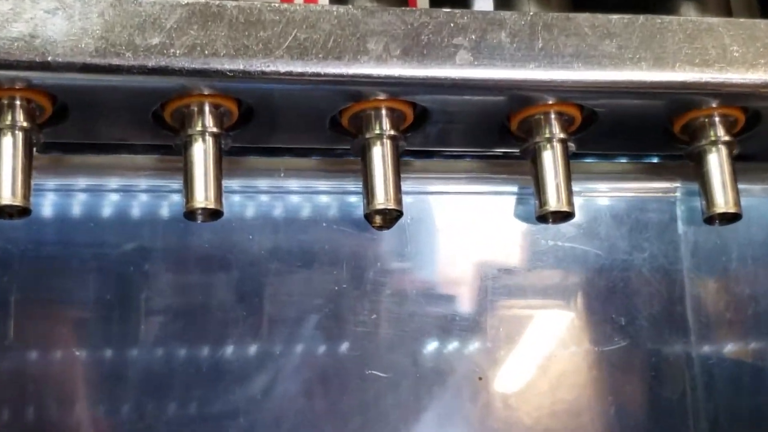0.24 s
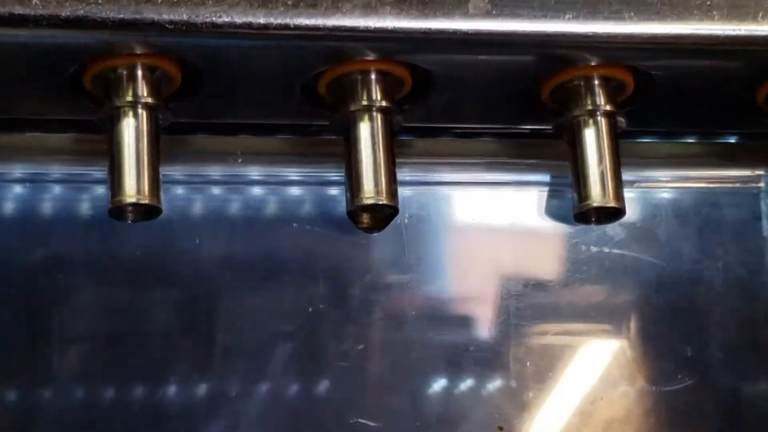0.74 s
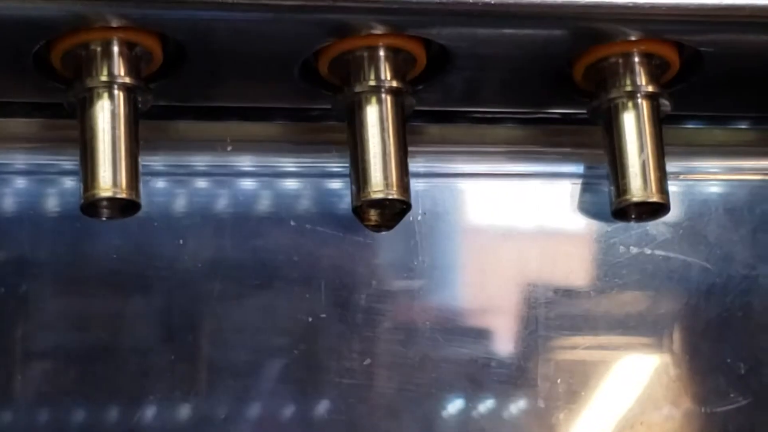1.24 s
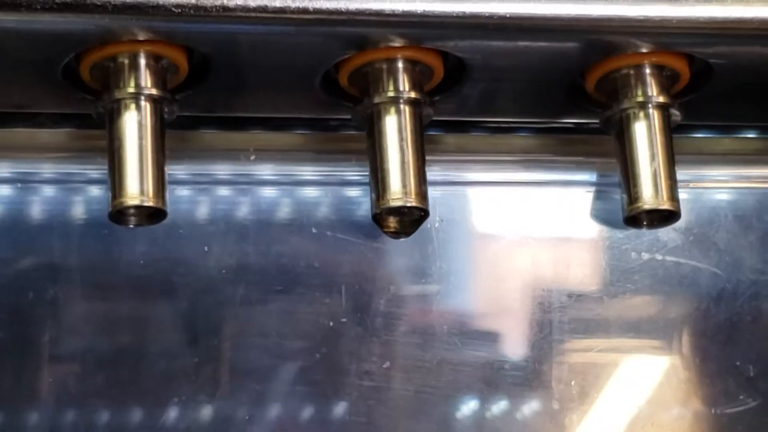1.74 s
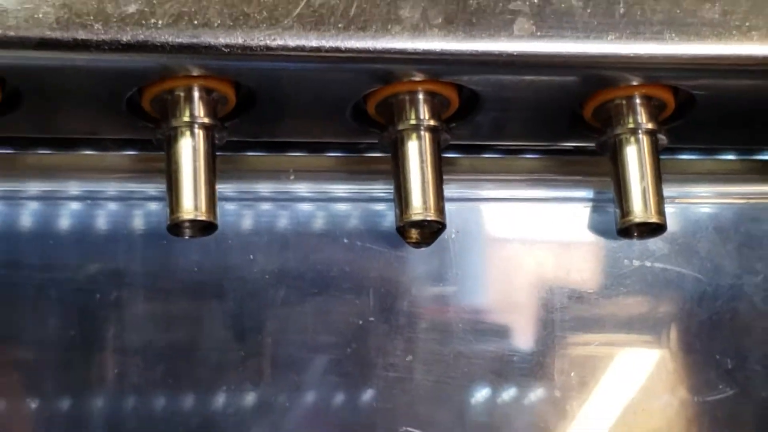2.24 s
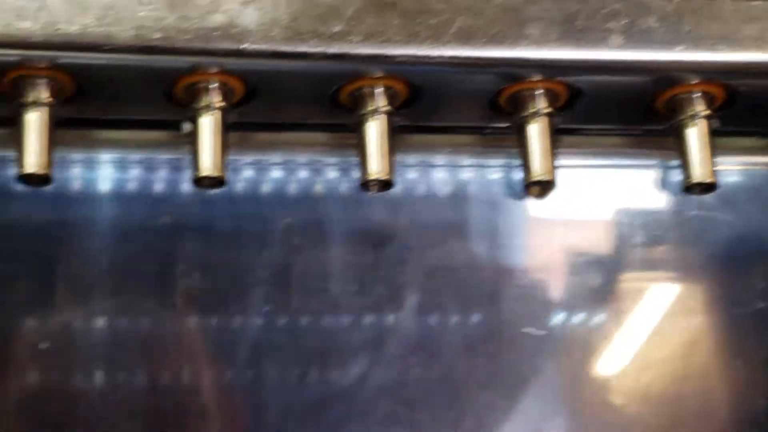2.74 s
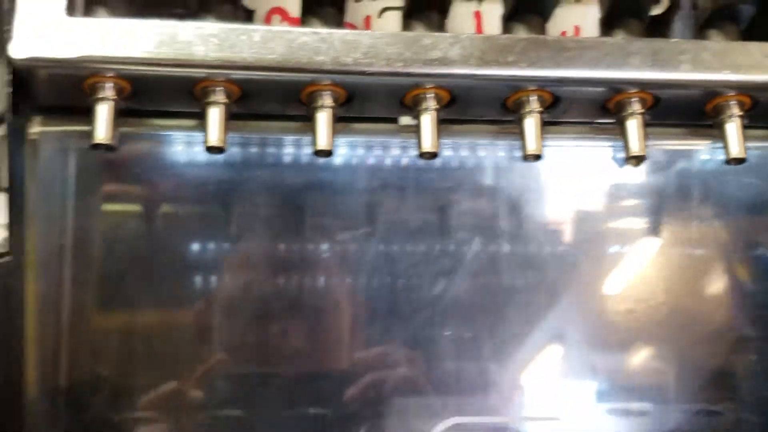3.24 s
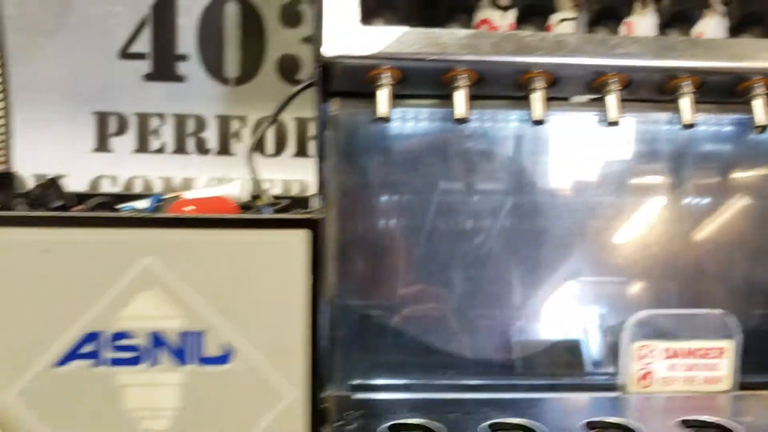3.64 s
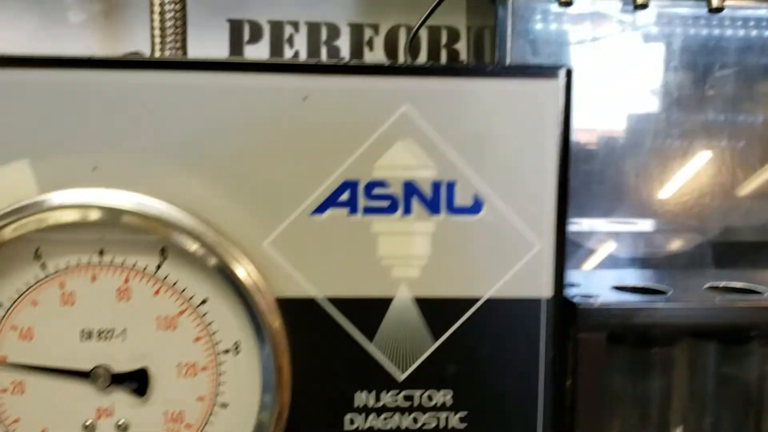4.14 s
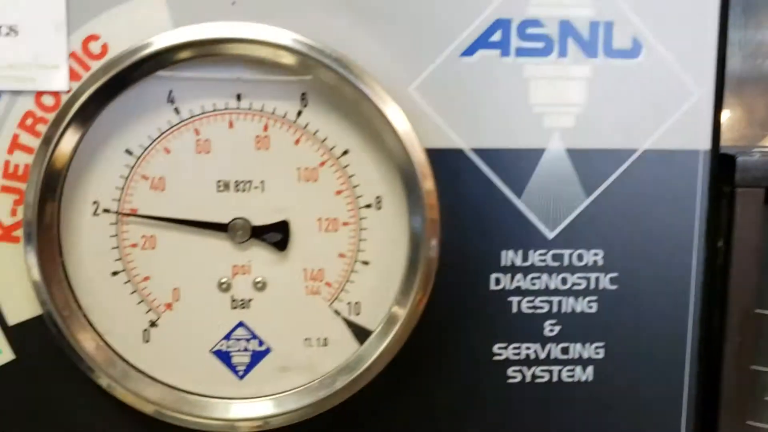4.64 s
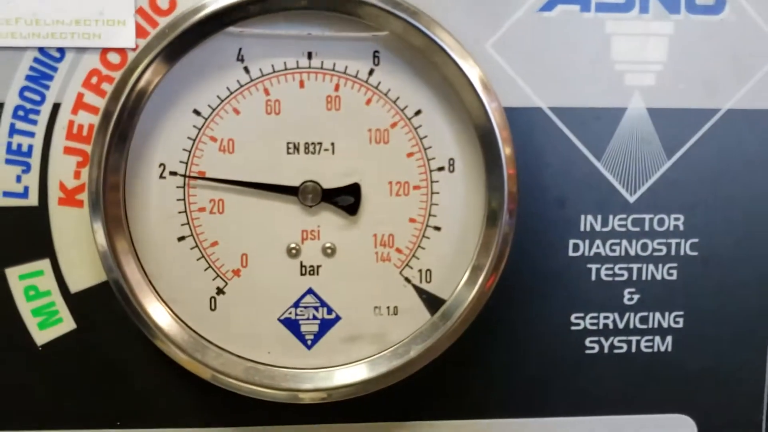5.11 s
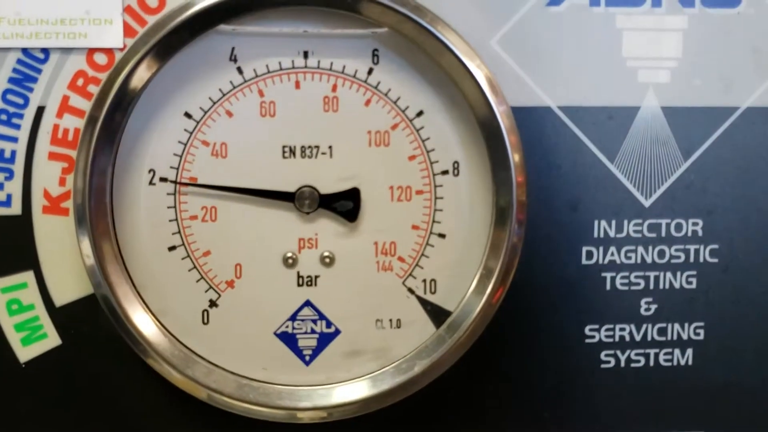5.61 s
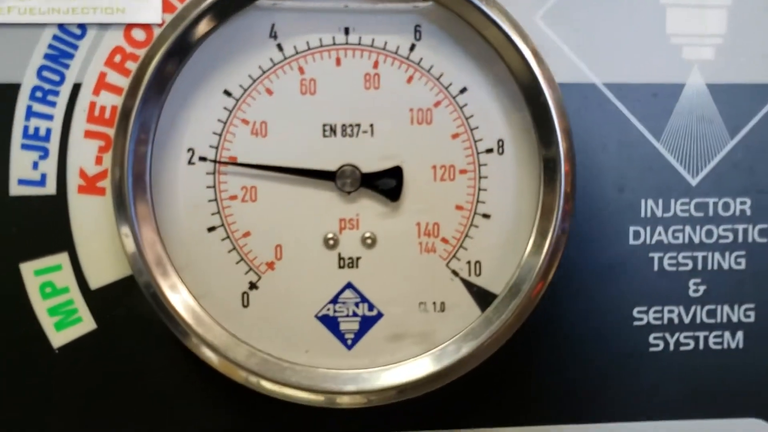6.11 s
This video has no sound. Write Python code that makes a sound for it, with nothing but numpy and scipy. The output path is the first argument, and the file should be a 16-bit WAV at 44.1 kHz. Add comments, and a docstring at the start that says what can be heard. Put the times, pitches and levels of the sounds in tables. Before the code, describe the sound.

From 0 to 1.6 seconds, an injector test bench runs steadily in a workshop, heard closely in stereo. A buzzy, slightly fluttering pump whine with many harmonics sits over a grainy, bright rush of fluid, with low mains and motor hum and fan rumble beneath. Small wet spits come around 0.2, 0.7 and 1.0 seconds, with a faint frame thrum near 0.2. At 1.6 the pump is switched off: its tones plunge and die in about a fifth of a second, the frame swells briefly, bright valve clicks snap, and a short hollow pipe knock lands at 1.7. The fluid sags and vanishes by about 1.9, with a last spit at 2.0. Then only beating low hum, fan rumble and a fine high hiss throbbing about seven times a second remain. From 3 to 4.5 the microphone glides to the cabinet and much of the hum strengthens, droning unchanged to the end at about 6.4.

```python
"""A fuel injector test bench in a workshop, heard in stereo.
At first a vane pump whines as a sum of shaft harmonics over rushing fluid, shaped from noise. Mains, motor
and fan hum as close, beating sines, a hiss throbs and fan air rumbles; all of these drone on to the end.
Fluid spits in the lines and the frame thrums. At 1.6 s the pump is switched off: its tones fall and die
as it coasts down, valves click, and the pipes knock. From about 3 s the microphone glides from the spray
chamber to the control cabinet, where much of the hum is stronger."""
import sys
import numpy as np
from scipy import signal
from scipy.fft import rfft, irfft, next_fast_len
from scipy.io import wavfile
from scipy.ndimage import uniform_filter1d, map_coordinates

SR = 44100
rng = np.random.default_rng(int(sys.argv[2]) if len(sys.argv) > 2 else 0)


def dump(signal):
    """Clip the signal to [-1, 1] and save it as 16-bit WAV at the path in sys.argv[1]."""
    limited = np.clip(np.atleast_2d(signal).T, -1, 1)
    pcm = np.round(limited * 32767).astype(np.int16)
    wavfile.write(sys.argv[1], SR, pcm)


N = 280917
TIME_S = np.arange(N) / SR
TOP_HZ = 15750  # band limit of the recorder
SWITCH_OFF_S = 1.608  # the pump loses power
MOVE_S, MOVE_EASE_S = 3.63, 0.41  # the microphone's move: halfway time and easing time


def amp(db):
    """Level: a gain is ten to the power of a twentieth of its decibels."""
    return 10 ** (np.asarray(db) / 20)


def unit(x):
    """Normalization: scale to a root mean square of 1."""
    return x / np.sqrt(np.mean(x ** 2) + 1e-20)


def along(points, hz):
    """Logarithmic interpolation: read (Hz, value) points on a log frequency axis."""
    f, v = np.transpose(points)
    return np.interp(np.log(hz + 1), np.log(f + 1), v)


def since(s):
    """Elapsed time: seconds since a moment, 0 before it."""
    return np.maximum(TIME_S - s, 0)


def nearness():
    """Sigmoid motion: the microphone's nearness to the cabinet, 0 to 1, through one smooth move."""
    return .5 + .5 * np.tanh((TIME_S - MOVE_S) / (2 * MOVE_EASE_S))


def wobble(rate):
    """Slow random modulation: a smooth curve through random knots, rate knots a second."""
    knots = rng.standard_normal(int(N * rate / SR) + 4)
    return map_coordinates(knots, [np.arange(N) * rate / SR])


def sputter(rate, decay_s):
    """Shot noise: random spits, rate a second, start at once and decay exponentially; mean 0, rms 1."""
    impulses = (rng.random(N) < rate / SR) * rng.uniform(.5, 1, N)
    level = signal.lfilter([1], [1, -np.exp(-1 / (decay_s * SR))], impulses)
    return unit(level - level.mean())


def filtered(x, response):
    """Linear filtering: multiply the spectrum of x by a response of frequency."""
    m = next_fast_len(N + SR // 2)
    return irfft(rfft(x, m) * response(np.fft.rfftfreq(m, 1 / SR)), m)[..., :N]


def panned(lean_db):
    """Level panning: left and right gains that keep the total power."""
    pair = amp(np.array([[.5], [-.5]]) * lean_db)
    return pair / np.sqrt(np.mean(pair ** 2, axis=0))


# Likeness of the two channels. Each row: frequency in Hz, left-right correlation from -1 to 1.
LIKENESS = [(60, .99), (250, .95), (470, .8), (700, .35), (1400, -.05), (4000, 0)]


def half_angle(hz, lowest=-1):
    """Interchannel coherence: half the angle in radians whose cosine is the left-right correlation."""
    return np.arccos(np.clip(along(LIKENESS, hz), lowest, 1)) / 2


# Stereo balance. Each row: frequency in Hz, level of left over right in dB.
BALANCE = [(27, -1), (57, -2.3), (110, 3.3), (220, .5), (700, 2.5), (2400, 2), (4400, 0), (8100, 1),
           (13000, -1.5)]


def spread(pair, spectrum):
    """Diffuse field: two signals, coloured, become stereo of rms 1, alike in the bass, not in the treble."""
    def color(hz):
        angle = half_angle(hz)
        return amp(along(spectrum, hz)) * [np.cos(angle), np.sin(angle)]
    mid, side = filtered(pair, color)
    stereo = np.array([mid + side, mid - side])
    return unit(filtered(stereo, lambda hz: panned(along(BALANCE, hz))))


def rush(spectrum, ripple_db=1.48, patchy_db=1.3):
    """Turbulent noise: stereo of rms 1, rippled by panel reflections and patchy with turbulence."""
    z = signal.stft(rng.standard_normal((2, N)), nperseg=2048)[2]
    ripple = rng.standard_normal((2, z.shape[1], 1))
    ripple = unit(uniform_filter1d(ripple, size=3, axis=1))
    patches = uniform_filter1d(rng.standard_normal(z.shape[1:]), size=6, axis=0)
    patches = unit(uniform_filter1d(patches, size=3, axis=1))
    textured = z * amp(ripple_db * ripple + patchy_db * patches)
    pair = signal.istft(textured, nperseg=2048)[1][:, :N]
    return spread(pair, spectrum)


def tone(cycles, hz, lean_db):
    """Interchannel phase: a stereo sine of rms 1 whose left leads, more so for high tones."""
    lead = half_angle(hz)
    phase = 2 * np.pi * (cycles + rng.random())
    return np.sqrt(2) * panned(lean_db) * np.sin(phase + np.array([[lead], [-lead]]))


def resonance(hz, half_width_hz):
    """Resonance: stereo noise of rms 1 in one band, down to half amplitude a half-width off centre."""
    def band(f):
        return 1 / (1 + ((f * f - hz * hz) / (f * half_width_hz * 2 + 1)) ** 2)
    mid, side = filtered(rng.standard_normal((2, N)), band)
    side = side * np.tan(half_angle(hz, lowest=0))
    return unit(np.array([mid + side, mid - side]))


def burst(s, hz, half_width_hz, rise_s, t60_s):
    """Damped transient: one resonance rises and loses 60 dB in t60_s; about rms 1 at its crest."""
    age = since(s)
    shape = (1 - np.exp(-age / rise_s)) * amp(-60 * age / t60_s)
    return unit(shape * resonance(hz, half_width_hz)) * np.sqrt(np.mean(shape ** 2)) / shape.max()


PUMP_HZ, COAST_S = 52.1, .09  # full shaft speed, and time constant of its exponential fall
STALL_SHARE = 0.18  # below this share of full speed the tones die
WHINE_DB = 0.33  # added to the whole pump
SHAKE_DB = 3.5  # the slowing pump shakes its mounts more: extra level towards standstill
# Pump tones, many at multiples of its nine vanes. Each row: shaft order (multiple of the shaft speed),
# level in dB before WHINE_DB, level of left over right in dB.
PUMP_TONES = [(2, -44, 1), (3, -50, 4), (5, -49.5, 1), (9, -41, 1), (11, -61, 6), (18, -47.5, 8),
              (19, -66, -4), (27, -54, 2), (28, -62, 10), (36, -57.5, 5), (45, -63, 7), (54, -60.5, 5),
              (63, -65, 12), (72, -67, 9), (90, -59, -8), (99, -63, -1), (117, -67, 4), (124, -67, 2),
              (134, -57.5, 10), (135, -60.5, -2)]
# Resonances of the frame, swept by the falling tones. Each row: frequency in Hz, relative response in dB.
FRAME_RESPONSE = [(60, -5), (100, 7), (128, 12), (170, -2), (210, 1), (250, 12.5), (300, -5.5), (370, -5),
                  (470, 1.5), (520, -1), (595, 17), (680, -1), (800, -4), (940, 3.5)]


def pump(drift=.0003, flutter_db=.5, treble_flutter_db=4.0, jitter_turns=0.00028, scrape_db=-52):
    """Harmonics of rotation: tones follow the shaft, and a brush scrape repeats with every turn."""
    speed = np.exp(-since(SWITCH_OFF_S) / COAST_S)
    turning = np.minimum(speed / STALL_SHARE, 1) ** 2
    turns = np.cumsum(PUMP_HZ * speed * (1 + drift * wobble(12.46))) / SR + jitter_turns * wobble(120)
    tones = np.zeros((2, N))
    for order, db, lean_db in PUMP_TONES:
        hz = order * PUMP_HZ
        flutter = (flutter_db + treble_flutter_db * np.sqrt(hz / TOP_HZ)) * wobble(35.0)
        swept_db = along(FRAME_RESPONSE, hz * speed) - along(FRAME_RESPONSE, hz)
        # high orders are the first to go as the speed drops
        level = amp(db + flutter + swept_db) * speed ** (hz / 1300)
        tones += level * tone(order * turns, hz, lean_db)
    track = rng.standard_normal((2, int(SR / PUMP_HZ)))  # one turn of roughness
    scrape = np.array([map_coordinates(side, [turns % 1 * len(side)], mode="grid-wrap") for side in track])
    scrape = amp(scrape_db) * speed ** 2 * spread(scrape, FLUID_SPECTRUM)
    return amp(WHINE_DB + SHAKE_DB * (1 - speed)) * turning * (tones + scrape)


FLOW_DB, SAG_DB_PER_S = -46, 23  # the flow holds while the pump runs, then sags with the pressure
SHUT_S, SHUT_DB_PER_S = 1.8, 300  # the regulator shuts and the flow dies
# Colour of fluid noise, also of the pump's scrape. Each row: frequency in Hz, relative level in dB.
FLUID_SPECTRUM = [(250, -6), (500, -2.5), (600, 8.5), (720, -2.5), (1300, -1.5), (1900, -4.5), (2600, -3),
                  (4200, -0.5), (4650, -3), (5200, -5), (7200, 2), (8100, -11.5), (10500, -7), (12100, 3),
                  (15500, -10)]


def fluid(surge_db=1.1, sputter_db=1.4, grain_db=1.4, rattle_db=-11, rattle_swing_db=3.5):
    """Flow noise: fluid rushes and sputters, rattling the regulator, until the pressure is gone."""
    flow_db = FLOW_DB - SAG_DB_PER_S * since(SWITCH_OFF_S) - SHUT_DB_PER_S * since(SHUT_S)
    texture_db = surge_db * wobble(14.0) + sputter_db * sputter(rate=45, decay_s=.01) + grain_db * wobble(500)
    stream = amp(texture_db) * rush(FLUID_SPECTRUM)
    rattle_level = amp(rattle_db + rattle_swing_db * sputter(rate=53, decay_s=.02))
    rattle = rattle_level * resonance(4700, 450)
    return amp(flow_db) * (stream + rattle)


# Steady tones of mains, motor and fan. Each row: frequency in Hz, level in dB, extra dB at the cabinet.
HUM_TONES = [(27.2, -58, -1), (56.7, -41.5, -4.5), (108.4, -47.5, 8), (113, -53.5, 6), (120.23, -40, 4.5),
             (169, -61.5, 10.5), (176.9, -55, 5), (197.2, -54.5, 3), (216.7, -46.5, 2.5), (226.4, -51.5, 0),
             (240, -47.5, -0.5), (327.3, -70, 10), (336.5, -64, 0), (377, -59.5, 0.5), (864, -63.5, -19)]


def hum(waver_db=0.55, drift_cycles=0.015):
    """Beating by superposition: close tones of mains, motor and fan interfere."""
    near = nearness()
    out = np.zeros((2, N))
    for hz, db, near_db in HUM_TONES:
        level = amp(db + near_db * near + waver_db * wobble(4))
        cycles = hz * TIME_S + drift_cycles * wobble(2.98)
        out += level * tone(cycles, hz, along(BALANCE, hz))
    return out


SLIP_BEAT_HZ = 6.89  # the motor's slip against the mains
# Colour of the hiss. Each row: frequency in Hz, relative level in dB.
HISS_SPECTRUM = [(2000, -11), (4500, -10), (7000, -6.5), (8400, -22), (10000, -9), (11000, -5.5),
                 (11800, 3), (12400, -1.5), (13500, -8), (15000, -19), (15700, -13)]


def hiss(db=-52.0, crest_s=0.058, uneven_db=1.0, sputter_db=.9, throb_db=2.8, grain_db=.9):
    """Amplitude modulation: fine hiss throbs with the motor's slip, rising faster than it falls."""
    beat = 2 * np.pi * SLIP_BEAT_HZ * (TIME_S - crest_s)
    throb = np.cos(beat) - .15 * np.sin(2 * beat)
    spit_db = sputter_db * sputter(rate=55, decay_s=0.012)
    texture_db = uneven_db * wobble(7.6) + spit_db + grain_db * wobble(900)
    return amp(db + throb_db * throb + texture_db) * rush(HISS_SPECTRUM)


# Colour of the panel rumble. Each row: frequency in Hz, relative level in dB.
ROOM_SPECTRUM = [(20, -36), (31, -13), (39, -7.5), (54, 3), (75, -7), (150, -5.5), (215, 2.5), (280, -10.5),
                 (360, -12.5), (480, -13.5), (780, -14.5), (1200, -20), (2600, -24), (7000, -29.5),
                 (8500, -38.5)]
# Hollows of the bench that ring in the fan's air. Each row: frequency in Hz, half-width in Hz,
# level in dB, extra dB at the cabinet.
BENCH_HOLLOWS = [(349, 20, -62.5, 0), (759.4, 14, -65.5, 5.5), (960, 39, -62.5, -7), (2490, 310, -65, 2)]


def workshop(db=-42.5, swell_db=0.65, murmur_db=1.5):
    """Cavity resonance: fan air rumbles in the panels and murmurs in the hollows of the bench."""
    near = nearness()
    out = amp(db + swell_db * wobble(5.02)) * rush(ROOM_SPECTRUM)
    for hz, half_width_hz, level_db, near_db in BENCH_HOLLOWS:
        level = amp(level_db + near_db * near + murmur_db * wobble(9))
        out += level * resonance(hz, half_width_hz)
    return out


# Spits of fluid in the lines. Each row: start in seconds, level in dB, centre in Hz.
LINE_SPITS = [(.16, -46.5, 4630), (.262, -45, 1260), (.715, -47, 6800), (.985, -44, 4230),
              (1.754, -47, 4580), (1.984, -43.5, 5800)]


def spits(width_share=0.092, rise_s=.004, t60_s=.075, lean_db=-1.5):
    """Damped resonance: fluid spits in the lines, each at its own pitch, as wide as its pitch is high."""
    out = np.zeros((2, N))
    for s, db, hz in LINE_SPITS:
        out += amp(db) * burst(s, hz, width_share * hz, rise_s, t60_s)
    return panned(lean_db) * out


# Pressure surges. Each row: start in seconds, level in dB.
PRESSURE_SURGES = [(.17, -43), (1.621, -36.5)]


def thrum(hz=583, half_width_hz=53, rise_s=0.025, t60_s=.17, lean_db=5):
    """Forced resonance: each pressure surge swells near the frame's strongest resonance."""
    out = np.zeros((2, N))
    for s, db in PRESSURE_SURGES:
        out += amp(db) * burst(s, hz, half_width_hz, rise_s, t60_s)
    return panned(lean_db) * out


# Clicks of switch and valves. Each row: start in seconds, level in dB, centre in Hz, half-width in Hz.
VALVE_CLICKS = [(1.612, -43, 9500, 6000), (1.653, -34, 12800, 1500), (1.687, -37, 9000, 7000)]


def valves(rise_s=0.0028, t60_s=.055, lean_db=-1):
    """Broadband transients: the switch and the valves click briefly and brightly as the pump stops."""
    out = np.zeros((2, N))
    for s, db, hz, half_width_hz in VALVE_CLICKS:
        out += amp(db) * burst(s, hz, half_width_hz, rise_s, t60_s)
    return panned(lean_db) * out


# Modes of the pipes. Each row: frequency in Hz, half-width in Hz, level in dB.
PIPE_MODES = [(450, 140, -36), (1240, 100, -46), (1590, 100, -49), (2490, 270, -46)]


def pipe_knock(knock_s=1.691, rise_s=0.0055, t60_s=0.16, lean_db=0):
    """Modal excitation: one blow, as the flow collapses, rings all the modes of the pipes."""
    out = np.zeros((2, N))
    for hz, half_width_hz, db in PIPE_MODES:
        out += amp(db) * burst(knock_s, hz, half_width_hz, rise_s, t60_s)
    return panned(lean_db) * out


def scene():
    """Linear superposition: all parts of the bench add together."""
    steady = pump() + fluid() + hum() + hiss() + workshop()
    return steady + spits() + thrum() + valves() + pipe_knock()


def record(dry):
    """Band limiting: the recorder keeps nothing at or above its limit."""
    return filtered(dry, lambda hz: hz < TOP_HZ)


dry = scene()
out = record(dry)
dump(out)
```